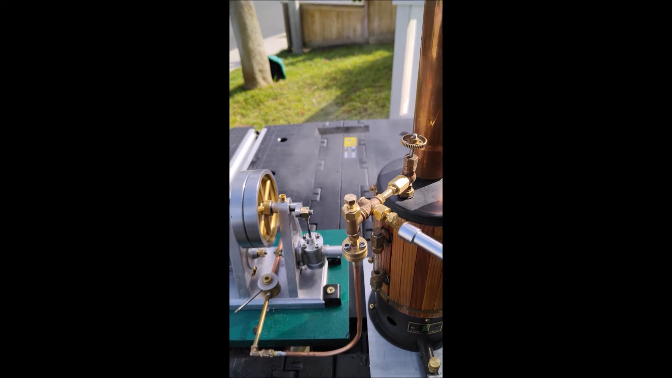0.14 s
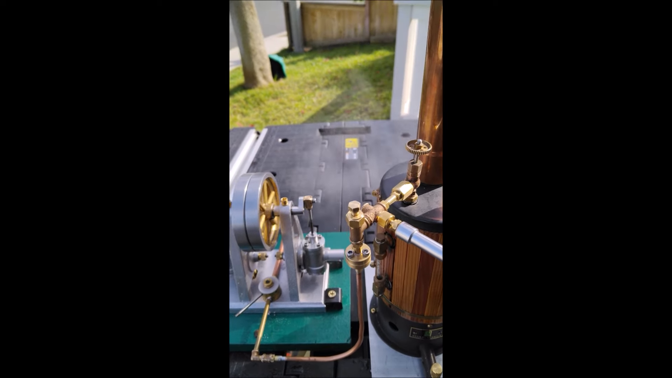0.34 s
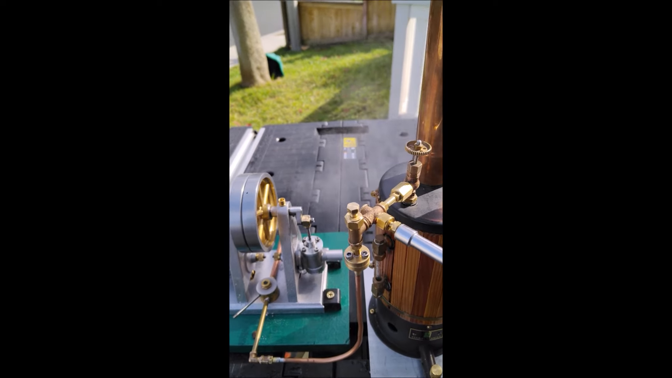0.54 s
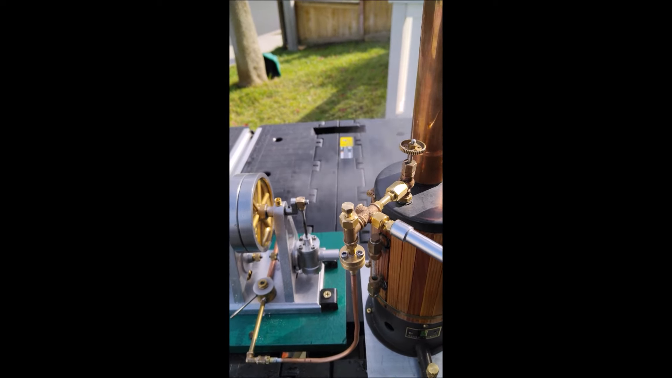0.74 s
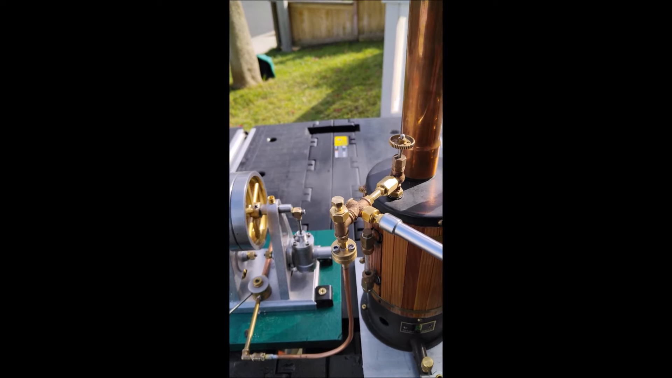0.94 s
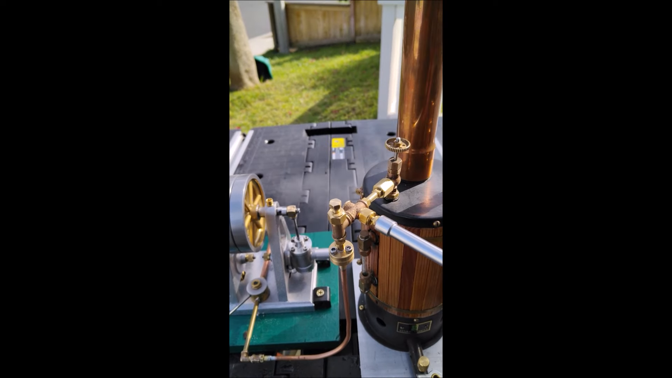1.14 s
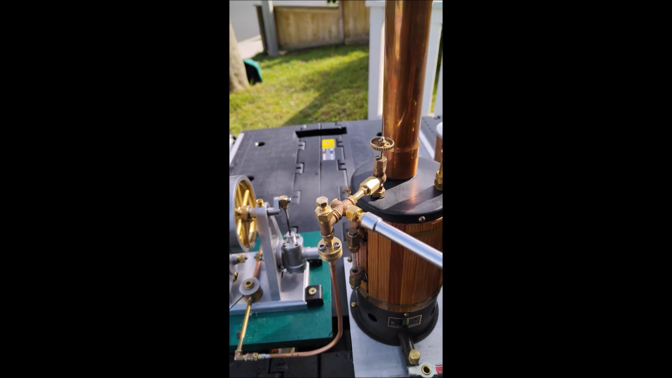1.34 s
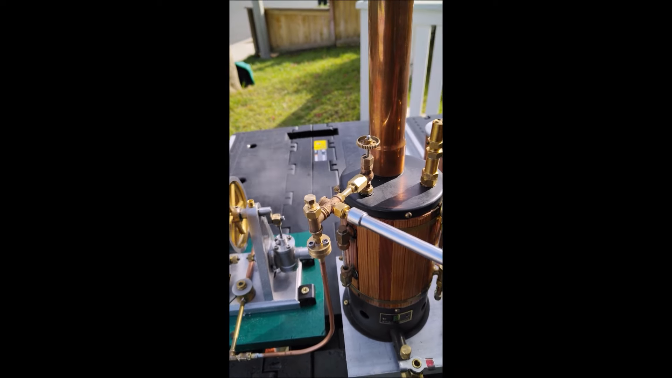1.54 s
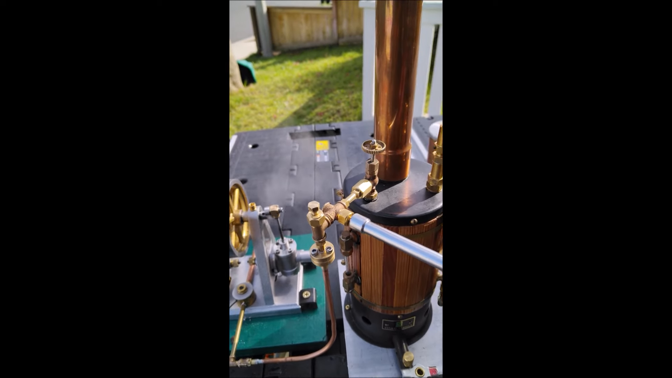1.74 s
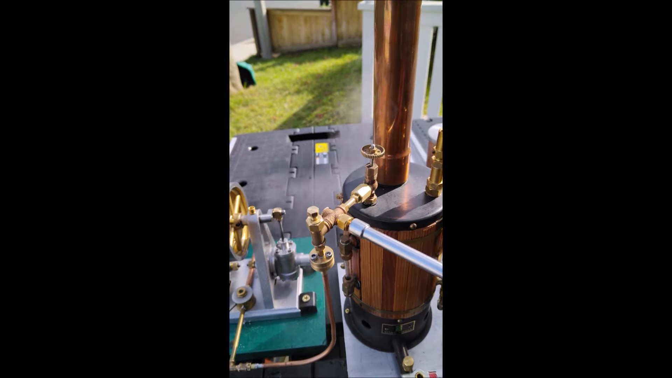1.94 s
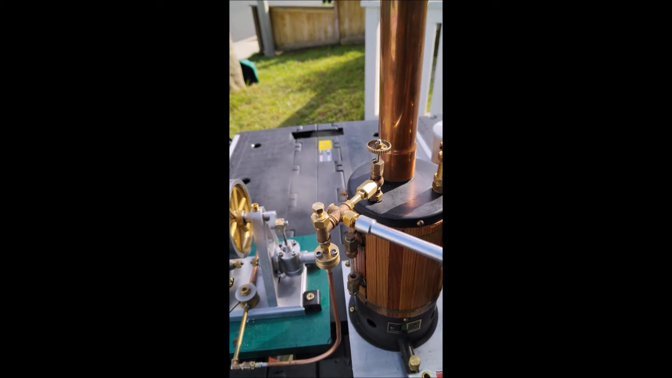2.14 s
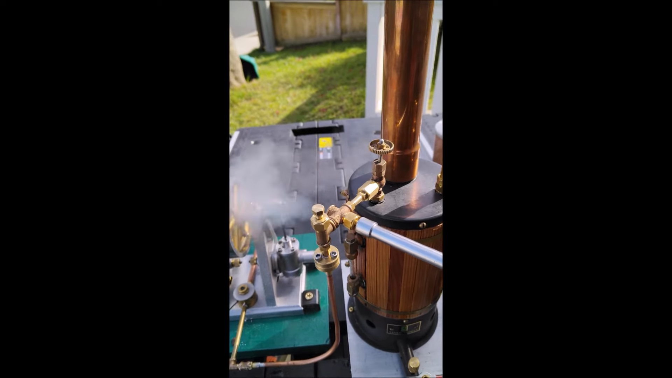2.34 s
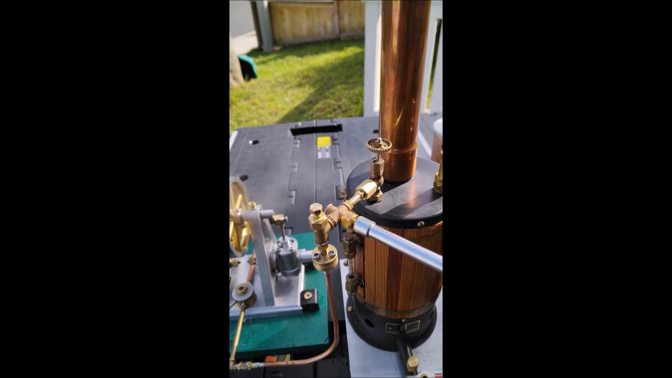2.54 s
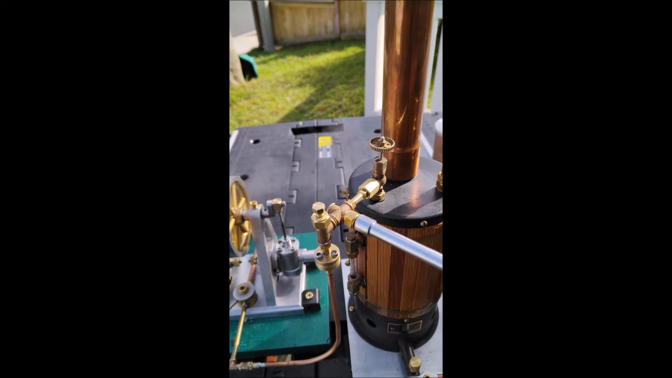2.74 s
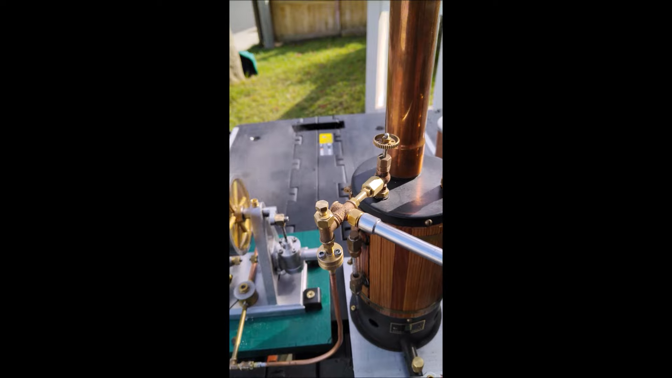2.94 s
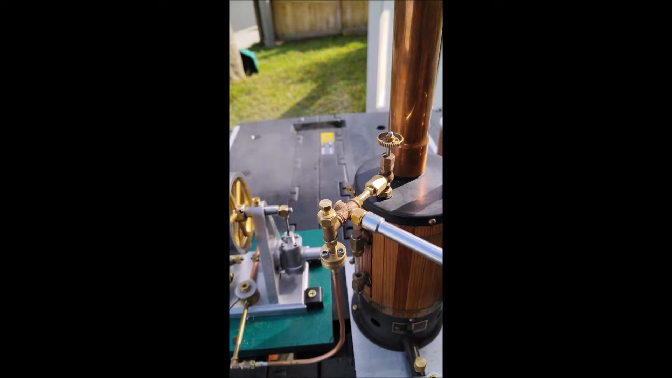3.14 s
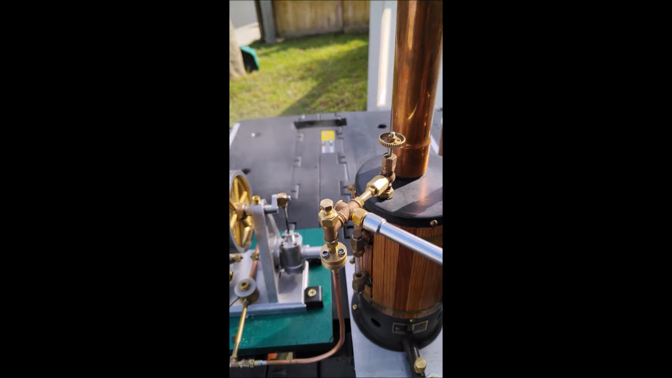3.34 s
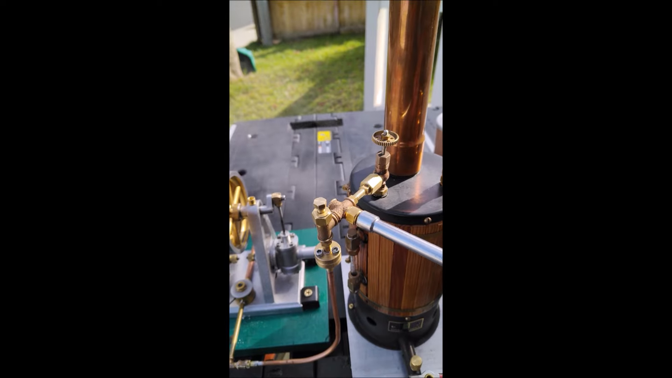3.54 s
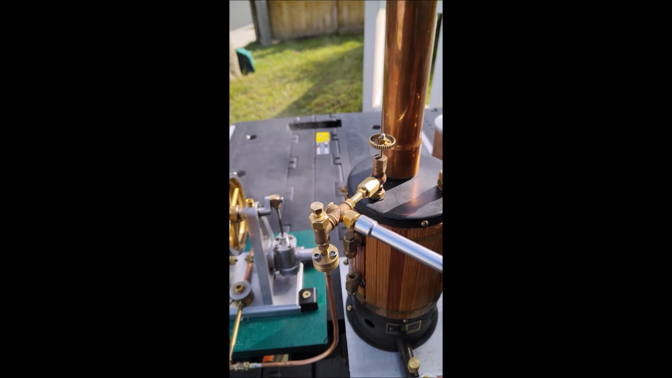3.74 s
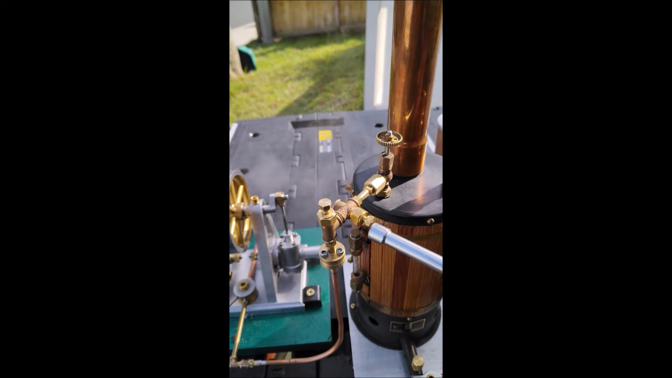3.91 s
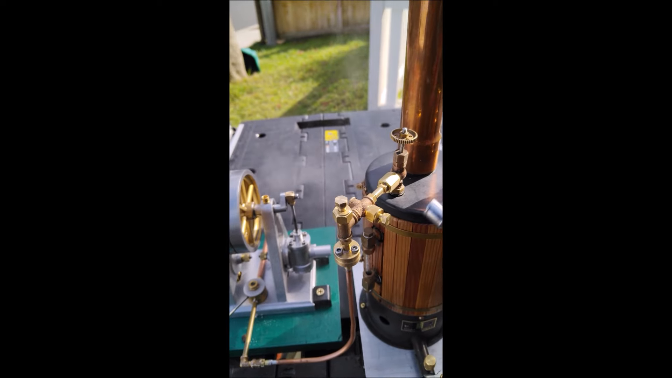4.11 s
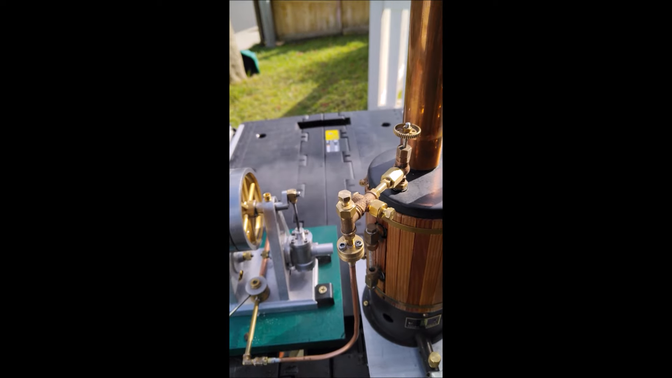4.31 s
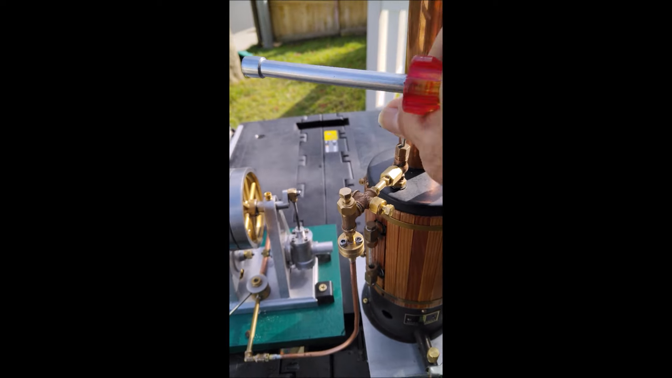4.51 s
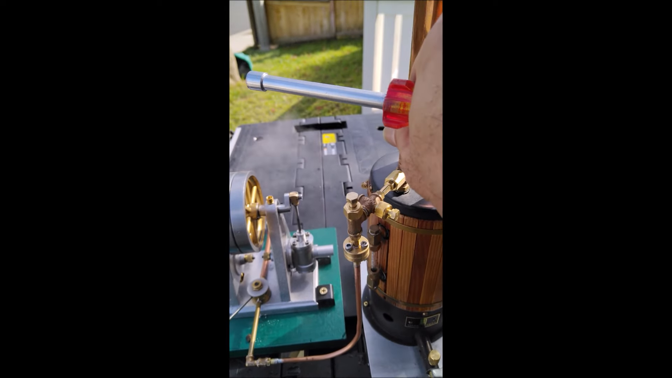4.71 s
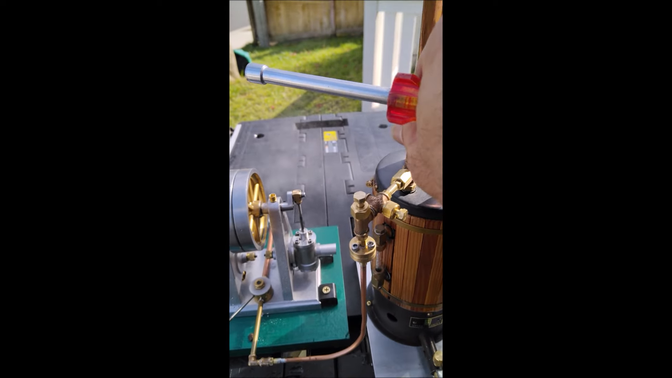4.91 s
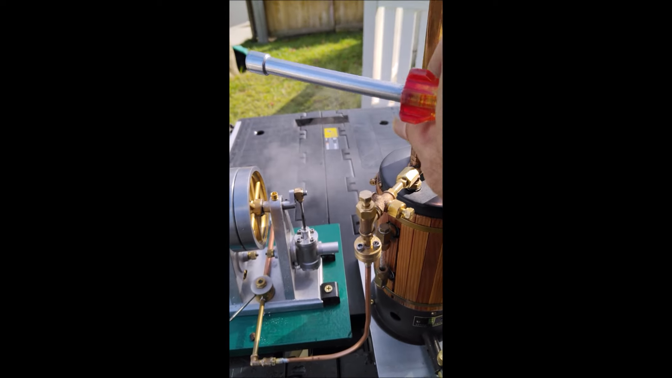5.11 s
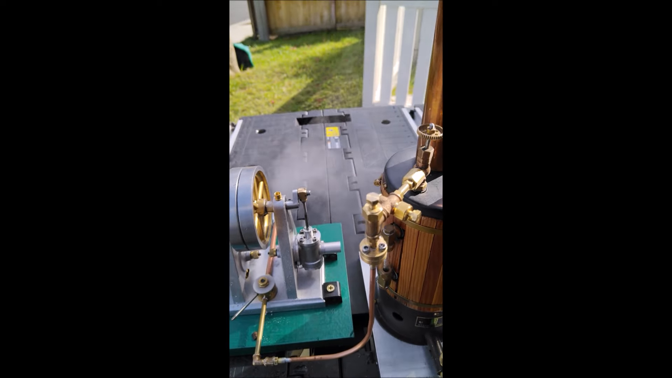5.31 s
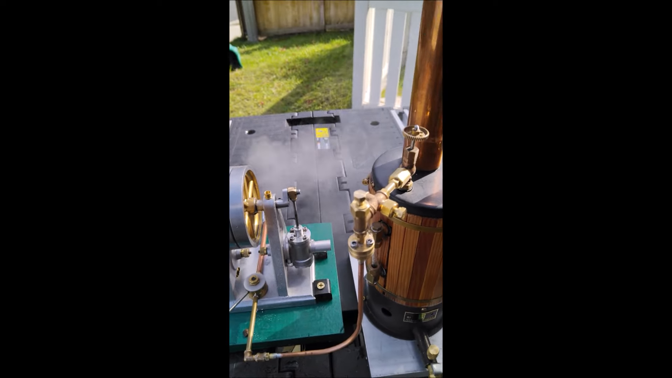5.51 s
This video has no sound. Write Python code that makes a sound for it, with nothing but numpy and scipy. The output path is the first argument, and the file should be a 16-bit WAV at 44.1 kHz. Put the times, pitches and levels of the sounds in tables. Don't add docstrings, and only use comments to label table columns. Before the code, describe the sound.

A small model steam engine runs outdoors, heard close on a handheld stereo device. From 0 s its exhaust spits in quick breathy chuffs, nearly twelve a second, uneven in strength and joined by a constant thin hiss, over very faint far rumble and the burner's soft roar. The tone shifts slightly as the device drifts. At about 2.2 s a valve blows off: a much louder, very bright, dry hiss, swelling by 2.5 s and covering the chuffs, with low flame flare, wind buffeting and a sharp tap near 2.7 s. It closes around 3.3 s; a weak stroke and one clear last puff at 3.6 s die away. A quiet, sputtering leak remains, growing duller, with small tool clicks and knocks at 3.9 to 4.2 s. From about 5.0 s steam hisses up again, fuller and less piercing, holding to the end at 5.6 s, with a tiny knock near 5.45 s.

```python
import sys
import numpy as np
from scipy import signal
from scipy.fft import rfft, irfft, dct, next_fast_len
from scipy.io import wavfile
from scipy.ndimage import uniform_filter1d, map_coordinates

SR = 44100
rng = np.random.default_rng(int(sys.argv[2]) if len(sys.argv) > 2 else 0)


def output_pcm(signal):
    pcm = np.clip(np.atleast_2d(signal).T, -1, 1) * 32767
    wavfile.write(sys.argv[1], SR, np.round(pcm).astype(np.int16))


def invert_db(level):
    return 10 ** (np.asarray(level, dtype=float) / 20)


N = 249606


def unit(x):
    return x / np.sqrt(np.mean(x ** 2) + 1e-20)


def along(points, hz, above_db=-120):
    f, v = np.transpose(points)
    return np.interp(np.log(hz + 1), np.log(f + 1), v, right=above_db)


def curves(rows, outside=None):
    s, *cols = np.transpose(rows)
    return [np.interp(np.arange(N) / SR, s, c, outside, outside) for c in cols]


def swells(rows):
    t = np.arange(N) / SR
    total = 0
    for s, db, rise, fall in rows:
        total = total + invert_db(db) * np.exp(-np.where(t < s, ((s - t) / rise) ** 2, (t - s) / fall))
    return total


def wobble(rate):
    return map_coordinates(rng.standard_normal(int(N * rate / SR) + 4), [np.arange(N) * rate / SR])


def filtered(x, response):
    m = next_fast_len(N + 4096)
    return irfft(rfft(x, m) * response(np.fft.rfftfreq(m, 1 / SR)), m)[..., :N]


def blur(v, size):
    over_bins = uniform_filter1d(v, size=size[0], axis=-2)
    return unit(uniform_filter1d(over_bins, size=size[1], axis=-1))


def shimmer(shape, shared):
    own = rng.standard_normal((2, 2, *shape))
    common = rng.standard_normal((2, 1, *shape))
    real, imag = blur(own + shared * common, size=(2, 14))
    return real + 1j * imag


def turbulence(alike, scatter, spit_db):
    a, b = signal.stft(rng.standard_normal((2, N)), nperseg=1024)[2]
    patches_db = .7 * blur(rng.standard_normal(a.shape), size=(12, 6))
    angle = np.arccos(np.clip(alike, 0, 1)) / 2
    z = np.array([np.cos(angle) * a + np.sin(angle) * b, np.cos(angle) * a - np.sin(angle) * b])
    z = z * invert_db(patches_db) * (1 + scatter * shimmer(a.shape, shared=0.99))
    pair = signal.istft(z, nperseg=1024)[1][:, :N]
    return pair * invert_db(spit_db * (wobble(25) + .7 * wobble(300)))


# (frequency [Hz], gain [dB])
PORT_RESPONSE = [
    [(1000, -0.5), (1350, -6), (1650, 2), (1880, 15.5), (2200, 0.5), (2600, -0.5), (3000, 11), (3300, -2.5), (3550, 11.5), (4000, 1), (4300, 2)],
    [(1000, -2.5), (1300, -7), (1900, 3.5), (2200, -1), (2950, 2), (3600, -3), (4100, 4.5), (4780, 3.5), (5200, 3), (5500, 2.5)],
]


def heard(spectra, echoes, alike, lag_ms, scatter, spit_db):
    pair = turbulence(alike, scatter, spit_db)

    def delay(hz, ms):
        return np.exp(-2j * np.pi * hz * ms / 1000)

    def path(hz, c):
        colour = invert_db(along(spectra[c], hz) + along(PORT_RESPONSE[c], hz, above_db=1.5))
        comb = 1 + sum(echo[2 + c] * delay(hz, echo[c]) for echo in echoes)
        return colour * comb * delay(hz, lag_ms * (1 - c))

    return unit(filtered(pair, lambda hz: [path(hz, c) for c in range(2)]))


def played(rows, jet, split_hz, body_db, fizz_db, body_db_per_s, fizz_db_per_s):
    flow_db = curves(rows, -120)[0]
    since = np.arange(N) / SR - rows[0][0]

    def below_split(hz):
        return 1 / (1 + (hz / split_hz) ** 16)

    body = unit(filtered(jet, lambda hz: hz ** 4 / (hz ** 4 + 900 ** 4) * below_split(hz)))
    fizz = unit(filtered(jet, lambda hz: 1 - below_split(hz)))
    body_gain = invert_db(body_db + body_db_per_s * since)
    fizz_gain = invert_db(fizz_db + fizz_db_per_s * since)
    return invert_db(flow_db) * (body_gain * body + fizz_gain * fizz)


# (time [s], level [dB])
ENGINE_FLOW = [(0, -37), (.6, -43.5), (1.8, -39.5), (2.3, -41.5), (2.7, -46), (3.25, -44.5), (3.335, -62),
               (3.4, -42.5), (3.49, -46), (3.53, -51), (3.59, -48), (3.65, -53.5), (3.72, -59), (3.9, -102)]
# (time [s], rate [strokes/s])
STROKE_RATE = [(0, 11.65), (1.2, 11.75), (2.0, 12.45), (2.9, 11.7)]
STROKE_LEVELS = [-17, -11.5, -10.5, -5, -4, -4, -3, -0.5, -3, -3.5, -5.5, -3, -7, -5, -11.5, -6, -5.5, -7,
                 -9, -6, -5.5, -7, -9, -6.5, -5, -7, -8.5, -5.5, -10, -6.5, -8.5, -3, -6.5, -7]
# (time [s], level [dB])
LAST_STROKES = [
    (3.377, -17),
    (3.5823, -4.5),
]


def steam():
    first_stroke_s, stall_s = 0.168, 2.8
    turned = np.cumsum(curves(STROKE_RATE)[0]) / SR
    number = np.floor(turned - turned[round(first_stroke_s * SR)])
    at = np.flatnonzero(np.diff(number[:round(stall_s * SR)]))
    kicks = np.zeros(N)
    kicks[at] = invert_db(np.resize(STROKE_LEVELS, len(at)))
    for s, db in LAST_STROKES:
        kicks[round(s * SR)] = invert_db(db)
    t = np.arange(SR // 4) / SR
    puff = (1 - np.exp(-t / 0.0055)) * np.exp(-t / 0.051)
    early = round(SR / 170)
    puffs = signal.fftconvolve(kicks, puff)[early:][:N]
    return invert_db(curves(ENGINE_FLOW)[0]) * (0.32 + 1.2 * puffs)


# (time [s], share of the second position [0-1])
PHONE_DRIFT = [(0, 0.14), (.9, 0.09), (1.5, 0.68), (2.3, 0.76)]
# (frequency [Hz], density [dB per Hz])
EXHAUST_FIRST = [
    [(200, -53.5), (600, -24), (2000, -22), (3220, -14.5), (4130, -30), (4360, -39), (4710, -27.5), (5400, -1.5), (5970, -7), (6200, -13), (6550, -31), (6780, -43), (7010, -23.5), (8610, -11.5), (10110, -6), (10340, -3.5), (10800, -22.5), (11370, -6.5), (11600, -35), (11940, -13.5), (12520, -6.5), (12980, -13), (13780, -5.5), (14240, -23), (15390, -15.5), (15540, -27)],
    [(200, -51.5), (600, -25.5), (2000, -15.5), (3220, -9), (3560, -18.5), (4130, -6.5), (5740, -3), (5970, 2.5), (6320, -11), (6430, -4), (7120, -2), (7460, -17), (8150, -18), (8380, -23.5), (8960, -34), (9300, -18), (9760, -17), (10110, -20), (10450, -25), (11370, -52), (11710, -22), (12980, -13), (14590, -35.5), (15040, -16.5), (15390, -32.5), (15540, -32.5)],
]
# (frequency [Hz], density [dB per Hz])
EXHAUST_SECOND = [
    [(200, -54), (600, -31), (2000, -24), (3220, -23), (4130, -18.5), (4480, -29), (4820, -12.5), (5740, -4.5), (6200, -17), (6430, -6.5), (7240, -18), (7460, -32.5), (7690, -2.5), (7920, -25), (8270, -2.5), (8840, -25.5), (9190, -5.5), (9530, -16.5), (10680, -15.5), (10910, -4), (11140, -18.5), (11830, -6.5), (12170, -11), (14360, -11), (15390, -32), (15540, -40)],
    [(200, -49), (600, -24), (2000, -19), (3220, -12), (3560, -13.5), (4480, -6), (5170, -6), (5510, -2.5), (5740, -17), (6090, 2.5), (6320, -8), (7120, -1), (7460, -9.5), (8380, -17), (8840, -26.5), (9420, -16), (9650, -56), (10450, -18), (11480, -39), (11710, -37), (11940, -20), (12520, -20.5), (12980, -13.5), (13900, -32.5), (15390, -12.5), (15540, -11)],
]
# (left delay [ms], right delay [ms], left gain [ratio], right gain [ratio])
ECHOES_FIRST = [(0.996, 1.23, 0.092, 0.065), (1.449, 1.8, 0.091, 0.12), (4.402, 3.6, 0.2, 0.35)]
# (left delay [ms], right delay [ms], left gain [ratio], right gain [ratio])
ECHOES_SECOND = [(0.819, 0.899, 0.12, 0.12), (1.428, 1.639, 0.092, 0.11), (3.303, 6, 0.2, 0.2)]


def exhaust(flow):
    angle = np.clip(curves(PHONE_DRIFT)[0], 0, 1) * np.pi / 2
    first = heard(EXHAUST_FIRST, ECHOES_FIRST, alike=0.85, lag_ms=0.035, scatter=.3, spit_db=0.3)
    second = heard(EXHAUST_SECOND, ECHOES_SECOND, alike=0.75, lag_ms=0.05, scatter=.3, spit_db=0.4)
    return invert_db(6.0) * flow * (np.cos(angle) * first + np.sin(angle) * second)


# (frequency [Hz], density [dB per Hz])
RUMBLE_SPECTRUM = [(15, -58), (25, -16.5), (113, -2), (231, -17), (270, -9), (300, -14.5), (390, -60),
                   (660, -120)]
# (time [s], peak level [dB], rise [s], fall [s])
RUMBLE_SWELLS = [(.3, -76.5, .12, 0.9), (1.0, -82, .04, 0.022), (1.21, -86, 0.041, 0.059),
                 (2.61, -73, 0.1, 0.095), (2.84, -66, 0.083, 0.061), (3.04, -77, 0.1, 0.17),
                 (4.22, -78.5, 0.067, 0.089), (4.44, -78, 0.022, 0.13), (4.71, -76.5, 0.05, 0.18),
                 (4.93, -97, 0.036, 0.67)]


def far_rumble():
    noise = heard((RUMBLE_SPECTRUM, RUMBLE_SPECTRUM), [], alike=0.75, lag_ms=0, scatter=.3, spit_db=0.5)
    return (invert_db(-78) + swells(RUMBLE_SWELLS)) * noise


# (frequency [Hz], density [dB per Hz])
BURNER_SPECTRUM = [(150, -10.5), (250, 2), (400, -2.5), (600, 5), (1100, -16), (1400, -1.5), (2500, -24)]


def burner(flow):
    idle_db, draw_db = -79.5, -28.5
    noise = heard((BURNER_SPECTRUM, BURNER_SPECTRUM), [], alike=0.5, lag_ms=0, scatter=.3, spit_db=1.0)
    return (invert_db(idle_db) + invert_db(draw_db) * flow) * noise


# (time [s], level [dB])
VALVE_FLOW = [(2.2, -53), (2.244, -37), (2.282, -31), (2.524, -27), (3.156, -30), (3.22, -33.5),
              (3.27, -38), (3.31, -53.5), (3.38, -66)]
# (frequency [Hz], density [dB per Hz])
VALVE_SPECTRUM = [
    [(200, -67), (600, -41.5), (2000, -37.5), (3220, -32.5), (4130, -32.5), (4480, -34), (5170, -22.5), (5630, -29), (6320, -20.5), (6660, -23), (7350, -26), (7580, -18.5), (8380, -6), (8610, -17.5), (8960, -9), (9190, -19), (9420, -8.5), (10680, -3.5), (11020, -6.5), (12630, 0), (13780, -6), (14360, -4), (14930, -2), (15160, -13), (15390, -2.5), (15540, 1.5)],
    [(200, -61), (600, -30), (2000, -30.5), (3220, -35.5), (3680, -15), (3900, -32.5), (4360, -31), (4710, -30.5), (5860, -16.5), (5970, -18), (6320, -26), (6660, -9.5), (7010, -15), (7350, -8), (7690, -9.5), (8380, -14), (8610, -11.5), (9190, -10), (10570, -19), (10800, -23), (11370, -14), (14010, -13.5), (14470, -18), (14700, -17), (15390, -3.5), (15540, -7)],
]
# (left delay [ms], right delay [ms], left gain [ratio], right gain [ratio])
VALVE_ECHOES = [(1.5, 1.7, 0.055, 0.08), (2.098, 0.9, 0.075, 0.029), (4.898, 4.2, 0.17, 0.12)]


def blowoff():
    jet = heard(VALVE_SPECTRUM, VALVE_ECHOES, alike=0.65, lag_ms=0.424, scatter=.3, spit_db=0.13)
    return played(VALVE_FLOW, jet, split_hz=9400, body_db=-9.0, fizz_db=2.5,
                  body_db_per_s=1.5, fizz_db_per_s=0.3)


# (frequency [Hz], density [dB per Hz])
FLARE_SPECTRUM = [(76, -28), (130, -5.5), (238, -4.5), (725, -1), (820, -8.5), (1500, 0.5), (1950, -38.5),
                  (3300, -120)]
# (time [s], peak level [dB], rise [s], fall [s])
FLARE_SWELLS = [
    (2.47, -61, 0.073, 0.31),
    (2.72, -65, 0.11, 0.2),
    (3.91, -65.5, 0.011, 0.05),
    (5.2, -76, 0.44, 0.63),
    (5.47, -74, 0.07, 0.31),
]


def flares():
    noise = heard((FLARE_SPECTRUM, FLARE_SPECTRUM), [], alike=0.5, lag_ms=0, scatter=.3, spit_db=0.6)
    return swells(FLARE_SWELLS) * noise


# (frequency [Hz], density [dB per Hz])
BUFFET_SPECTRUM = [(90, -32), (150, 0.5), (300, -3), (450, -2), (650, -21.5), (1200, -120)]
# (time [s], peak level [dB], rise [s], fall [s])
BUFFET_SWELLS = [
    (2.5, -71.5, 0.098, 0.16),
    (2.8, -72.5, 0.11, .1),
    (3.08, -69.5, .08, 0.089),
    (3.26, -73.5, 0.076, .05),
    (3.39, -74.5, 0.02, 0.043),
]


def buffeting():
    noise = heard((BUFFET_SPECTRUM, BUFFET_SPECTRUM), [], alike=0.4, lag_ms=0, scatter=.4, spit_db=1.5)
    return swells(BUFFET_SWELLS) * noise


# (time [s], peak level [dB], body tone [Hz], t60 [s], brightness [0-1])
TOOL_TAPS = [(2.675, -35, 896, 0.023, 0.9), (3.361, -68.5, 400, 0.09, 0), (3.549, -73, 587, .1, 0),
             (3.635, -68, 560, .1, 0), (3.899, -45.5, 473, 0.019, 0.32), (3.968, -66, 285, 0.38, 0.05),
             (3.986, -47, 1520, 0.022, 0.66), (3.998, -49, 1570, 0.013, 0.7), (4.03, -62.5, 294, 0.17, 0.3),
             (4.199, -43, 1787, 0.0078, 0.34), (5.454, -51, 990, 0.058, 0)]


def taps():
    out, t = np.zeros(N + SR), np.arange(SR // 4) / SR
    onset = 1 - np.exp(-t / 0.0012)
    for s, db, hz, t60, bright in TOOL_TAPS:
        noise = rng.standard_normal(len(t))
        rattle = unit(uniform_filter1d(noise, size=24))
        modes = sum(g * np.sin(2 * np.pi * hz * k * t) for k, g in [(1, 0.89), (1.7, 0.96), (2.4, .2)])
        body = (modes + 0.76 * bright * rattle) * invert_db(-60 * t / t60)
        ring = np.sin(2 * np.pi * max(hz, 1850) * t) * invert_db(-60 * t / 0.018)
        crack = ring + 0.69 * noise * invert_db(-60 * t / 0.0059)
        out[round(s * SR):][:len(t)] += invert_db(db) * onset * ((1 - bright) * body + bright * crack)
    thinned = filtered(out[:N], lambda hz: hz ** 6 / (hz ** 6 + 210 ** 6))
    return thinned * invert_db([[1.2], [-1.2]])


# (time [s], level [dB])
GLAND_FLOW = [(3.3, -55.5), (3.335, -62), (3.394, -57.5), (3.67, -56), (4.142, -57), (4.208, -53.5),
              (4.8, -52.5), (5.0, -50), (5.2, -58)]
# (frequency [Hz], density [dB per Hz])
GLAND_SPECTRUM = [
    [(200, -49), (600, -26.5), (2000, -17), (3220, -15.5), (3900, -24), (4020, -17), (5280, -14), (6200, -12), (6660, -17), (7120, -16), (7350, -31), (7810, -12), (8380, -16), (8840, -28), (9070, -12.5), (9990, -22), (10910, -4), (11480, -13), (12290, -12.5), (12630, -7), (13550, -26), (13780, -8.5), (14700, -28), (15160, -20), (15390, -27), (15540, 4)],
    [(200, -46), (600, -23.5), (2000, -16), (3220, -10), (3450, -21.5), (4020, -12), (4250, -12.5), (4480, -15), (4820, 2), (5280, -16), (5510, -3.5), (5860, -18), (6090, -1.5), (6430, -9), (7120, -5), (7350, -12), (8040, -27), (8380, -9), (9650, -38), (10110, -12), (10570, -69), (11140, -22.5), (13900, -15), (14700, -34), (15390, -21), (15540, -10)],
]
# (left delay [ms], right delay [ms], left gain [ratio], right gain [ratio])
GLAND_ECHOES = [(0.72, 1.295, 0.04, 0.15), (1.197, 1.805, 0.17, 0.13), (2.3, 2.974, .15, .15)]


def gland_leak():
    jet = heard(GLAND_SPECTRUM, GLAND_ECHOES, alike=0.7, lag_ms=0.083, scatter=.3, spit_db=0.6)
    return played(GLAND_FLOW, jet, split_hz=10960, body_db=6.0, fizz_db=4.0,
                  body_db_per_s=-0.7, fizz_db_per_s=-9.5)


# (time [s], level [dB])
COCK_FLOW = [(4.8, -68.5), (5.03, -55), (5.074, -45.5), (5.236, -44), (5.474, -41.5), (5.57, -43),
             (5.66, -42.5)]
# (frequency [Hz], density [dB per Hz])
COCK_SPECTRUM = [
    [(200, -53), (600, -18.5), (2000, -19), (3220, -16.5), (3330, -12), (3560, -16.5), (3900, -14), (4590, -7), (5050, -13), (5170, -8), (5280, -7), (5510, -19), (5970, -16), (6320, -4), (7240, -19), (9880, -3), (10220, 1), (10570, -4), (11020, 5), (11370, -4.5), (12060, -9.5), (13210, -1), (14010, -12), (14590, -20), (15390, -11), (15540, -22)],
    [(200, -48), (600, -17), (2000, -16.5), (3220, -5), (3450, -11), (3560, -15), (3790, -10.5), (4020, -16), (4820, 0.0), (5280, -5.5), (5510, -4), (5860, -4), (6090, -4.5), (6430, 0.5), (6660, -3.5), (7690, -7.5), (8150, -8.5), (10680, -12), (11940, -9), (13090, -15), (13320, -22), (13900, -14), (14470, -19), (14700, -4), (15390, -11), (15540, -4)],
]
# (left delay [ms], right delay [ms], left gain [ratio], right gain [ratio])
COCK_ECHOES = [(.95, 1.673, 0.028, 0.14), (1.7, 0.764, 0.048, 0.073), (2.4, 7.2, 0.1, 0.074)]


def reopened_cock():
    jet = heard(COCK_SPECTRUM, COCK_ECHOES, alike=0.6, lag_ms=.12, scatter=.2, spit_db=0.1)
    return played(COCK_FLOW, jet, split_hz=9600, body_db=-1, fizz_db=6.0,
                  body_db_per_s=5.5, fizz_db_per_s=-13.0)


# (time [s], centre [Hz], depth [dB])
SLIDING_NULLS = [
    [(0, 3800, -2), (1.4, 3750, 12), (2.25, 3620, 7.5), (2.45, 3770, 7), (3.05, 3904, 4.5), (3.2, 3400, 9), (4.0, 3360, 15), (4.15, 3970, 4), (4.75, 3800, 9), (5.1, 3860, 5.5), (5.3, 3600, 5), (5.45, 4130, 5), (5.66, 4220, 5)],
    [(0, 2140, 4), (1.3, 2210, 7), (2.3, 2220, 3), (2.7, 2230, 3), (3.3, 2350, 11), (3.6, 2206, 3), (4.05, 2196, 3.5), (5.66, 2225, 3)],
    [(0, 8040, 12), (.7, 8130, 3), (1.1, 8200, 12), (2.2, 8520, 20), (3.0, 8650, 13), (3.5, 8570, 5), (4.0, 7600, 3), (4.4, 8300, -14), (5.66, 8100, 6)],
    [(0, 6230, 7), (2.2, 6270, -5), (3.2, 6250, 17), (3.4, 6460, 4), (3.95, 5850, 10), (4.2, 6930, 9), (4.5, 6430, -10), (5.66, 6500, 10.5)],
]
# (frequency [Hz], share of the direct sound [ratio])
SHIFTING_ECHOES = [(300, .25), (1500, .45), (2500, .8), (6500, .85), (9000, .6), (16000, .35)]


def reflected(x):
    hz, t, z = signal.stft(x, SR, nperseg=1024)
    loss_db = 0
    for rows in SLIDING_NULLS:
        s, centre, depth = np.transpose(rows)
        wander = 1 + .012 * np.interp(t, np.arange(N) / SR, wobble(7))
        offset_hz = hz[:, None] - np.interp(t, s, centre) * wander
        loss_db = loss_db + abs(np.interp(t, s, depth)) * np.exp(-(offset_hz / 100) ** 2)
    share = along(SHIFTING_ECHOES, hz, above_db=0)[:, None]
    echoes = (1 + share * shimmer(z.shape[1:], shared=2)) / np.sqrt(1 + 2 * share ** 2)
    return signal.istft(z * invert_db(-loss_db) * echoes, SR, nperseg=1024)[1][:, :N]


# (centre [Hz], width [Hz], gain [dB])
CASE_RESONANCES = [(1073, 69, 4.5), (2142, 110, -1.5), (3606, 110, -2), (4810, 190, 2), (8650, 270, 0)]


def phone_case(x):
    def response(hz):
        return invert_db(sum(db * np.exp(-((hz - centre) / wide) ** 2) for centre, wide, db in CASE_RESONANCES))

    return filtered(x, response)


def scene():
    flow = steam()
    garden = far_rumble() + burner(flow) + flares() + buffeting()
    jets = exhaust(flow) + blowoff() + gland_leak() + reopened_cock()
    port_gain = invert_db([[-3], [1.8]])
    return phone_case(reflected(jets + port_gain * garden) + taps())


# (frequency [Hz], level under the overall level [dB])
OVERALL_MASK = [(300, -46), (1200, -36), (2200, -19), (3500, -12), (6000, -7), (9000, -8), (12000, -11),
                (14800, -10), (15200, 4), (16000, 4)]
# (frequency [Hz], level against theirs [dB])
NEARBY_MASK = [(300, -6), (1200, -5.5), (1600, -6), (2100, -1), (3700, -2), (5000, -4), (8500, -1),
               (12000, -4.5), (16000, 1)]


def masked(dry):
    hop, shift, top = 1024, 633, 724
    count = (N + shift) // hop + 1
    window = np.sin(np.pi * (np.arange(2 * hop) + .5) / (2 * hop))
    padded = np.pad(dry, ((0, 0), (shift, 3 * hop)))[:, :(count + 1) * hop]
    blocks = padded.reshape(2, -1, hop)
    frames = np.concatenate([blocks[:, :-1], blocks[:, 1:]], axis=2) * window
    a, b, c, d = np.split(frames, 4, axis=2)
    z = dct(np.concatenate([-c[..., ::-1] - d, a - b[..., ::-1]], axis=2), type=4, norm="ortho")

    edges = np.r_[0:40:4, 40:96:8, 96:144:12, 144, 160, 176, 196, 216, 240, 264, 292, 320:hop:32]
    band = np.searchsorted(edges, np.arange(hop), side="right") - 1
    hz = (edges + 2) * SR / (2 * hop)
    power = np.add.reduceat(z ** 2, edges, axis=2) / np.bincount(band)
    power = uniform_filter1d(power, size=3, axis=1)
    nearby = uniform_filter1d(power.mean(axis=0), size=5, axis=1)
    overall = np.mean(z ** 2, axis=(0, 2))[:, None]
    hidden = invert_db(along(OVERALL_MASK, hz)) ** 2 * overall + invert_db(along(NEARBY_MASK, hz)) ** 2 * nearby
    chance = rng.standard_normal(power.shape) + 1.5 * rng.standard_normal(nearby.shape)
    budget_db = 3 * unit(uniform_filter1d(chance, size=4, axis=1))
    step = (np.sqrt(abs(hidden)) * invert_db(budget_db))[..., band] + 1e-9

    paired = (abs(np.log(power[0] / power[1])) < 1.1)[:, band]

    def swap(v):
        return np.where(paired, np.array([v[0] + v[1], v[0] - v[1]]) / np.sqrt(2), v)

    z = swap(z)
    rounded = np.sign(z) * step * np.floor(abs(z / step) ** .75 + .4054) ** (4 / 3)
    z = swap(rounded) * (np.arange(hop) < top)
    u, v = np.split(dct(z, type=4, norm="ortho"), 2, axis=2)
    frames = np.concatenate([v, -v[..., ::-1], -u[..., ::-1], -u], axis=2) * window
    heads, tails = np.split(frames, 2, axis=2)
    heads[:, 1:] += tails[:, :-1]
    return heads.reshape(2, -1)[:, shift:shift + N]


def band_limit(x):
    return signal.sosfilt(signal.butter(12, 16580, fs=SR, output="sos"), x)


def record(dry):
    mix = masked(dry)
    return band_limit(mix)


dry = scene()
out = record(dry)
output_pcm(out)
```